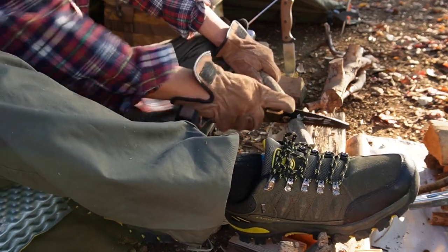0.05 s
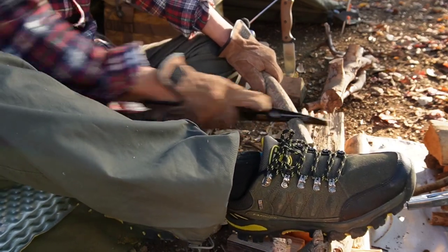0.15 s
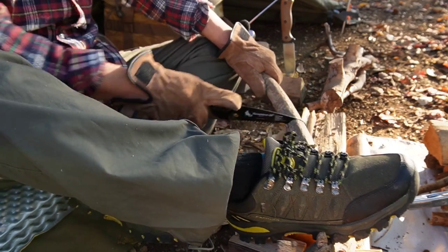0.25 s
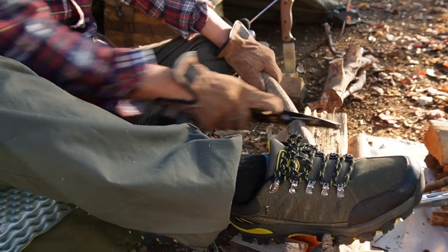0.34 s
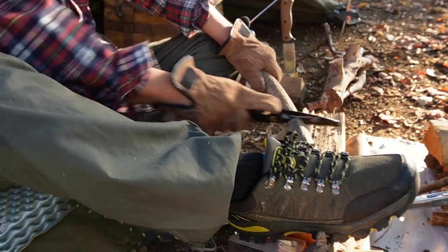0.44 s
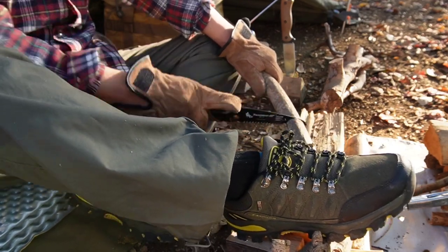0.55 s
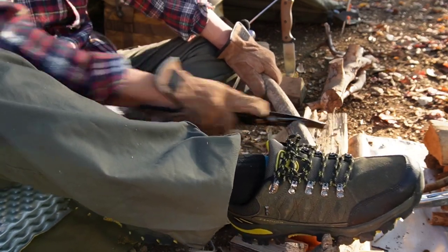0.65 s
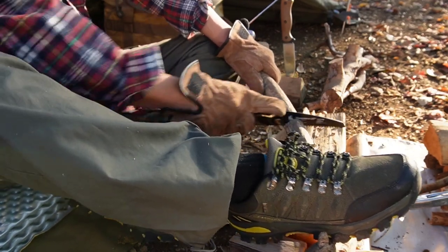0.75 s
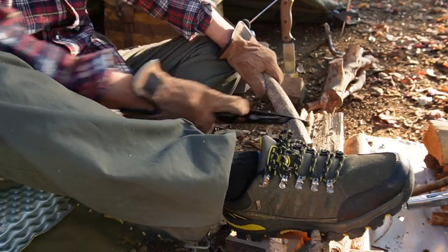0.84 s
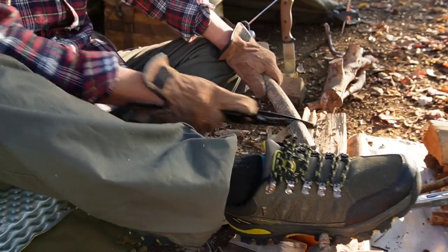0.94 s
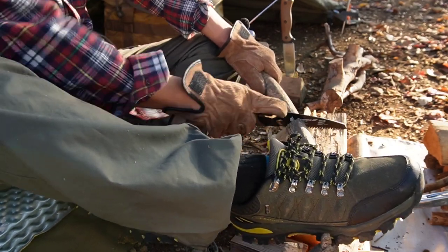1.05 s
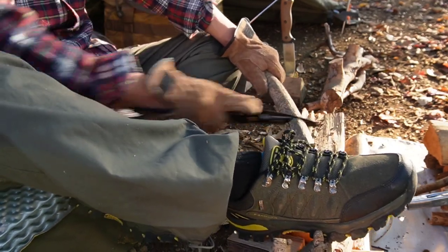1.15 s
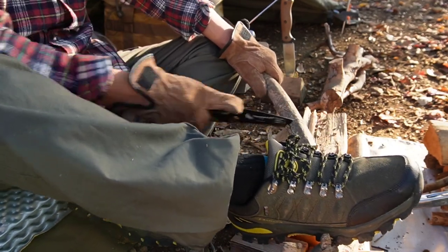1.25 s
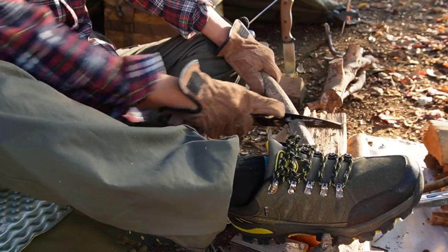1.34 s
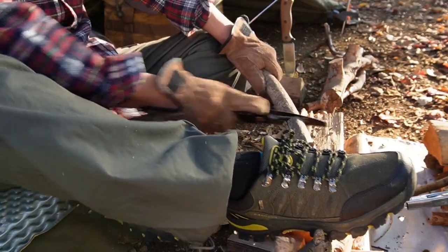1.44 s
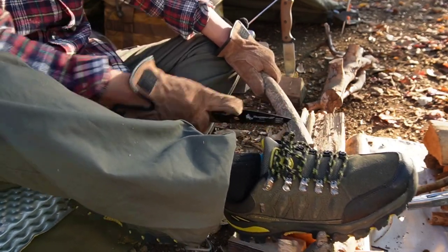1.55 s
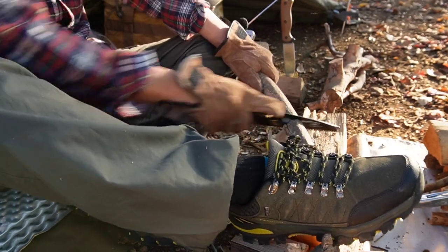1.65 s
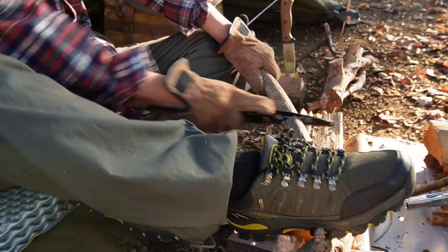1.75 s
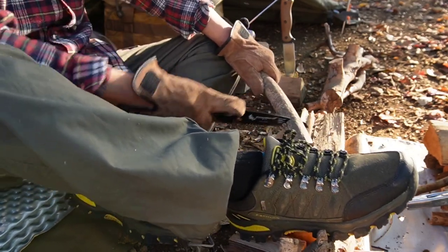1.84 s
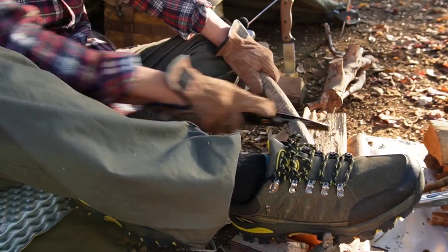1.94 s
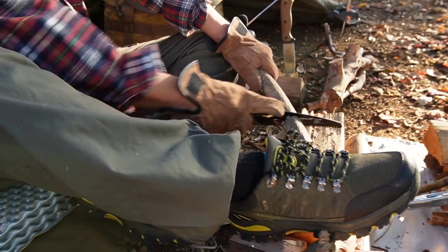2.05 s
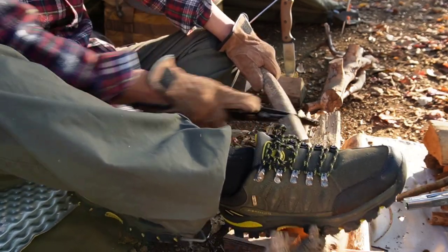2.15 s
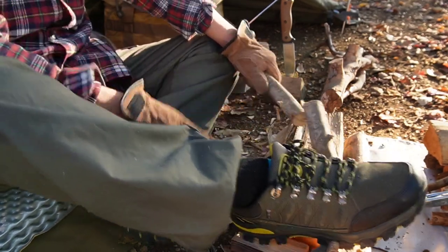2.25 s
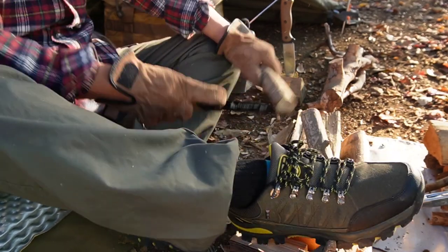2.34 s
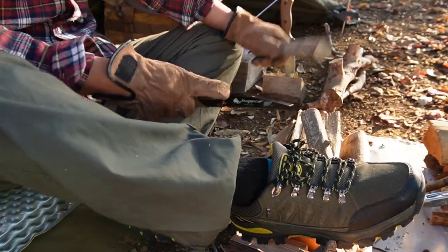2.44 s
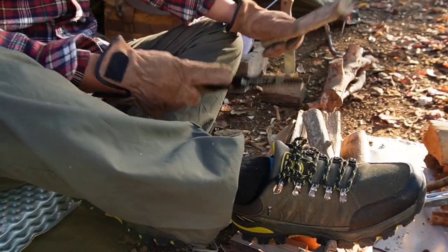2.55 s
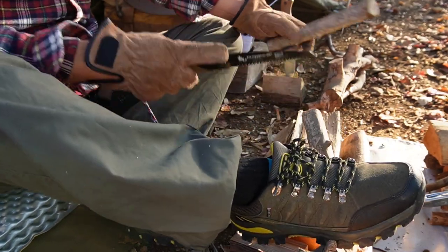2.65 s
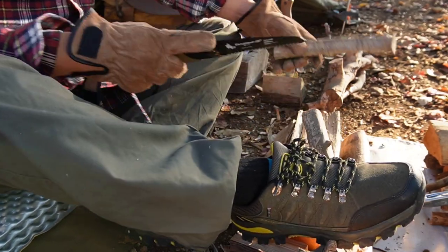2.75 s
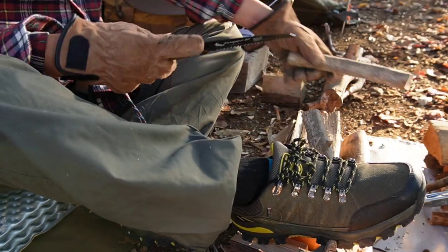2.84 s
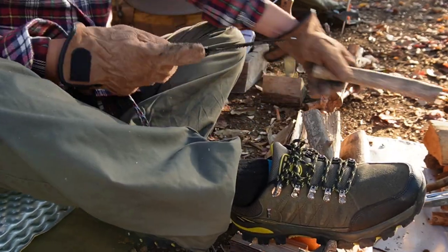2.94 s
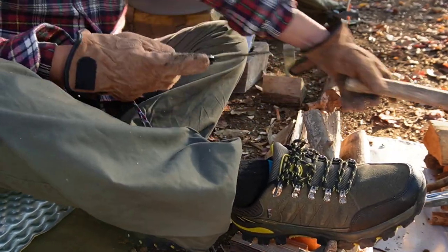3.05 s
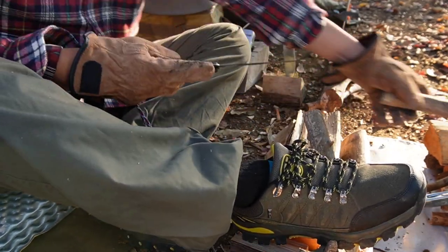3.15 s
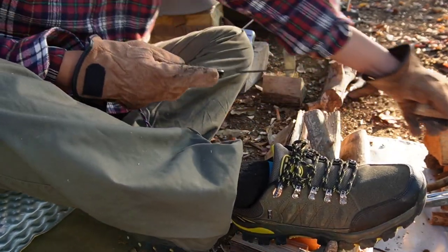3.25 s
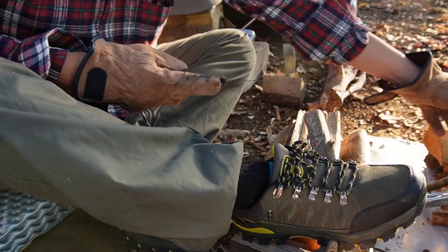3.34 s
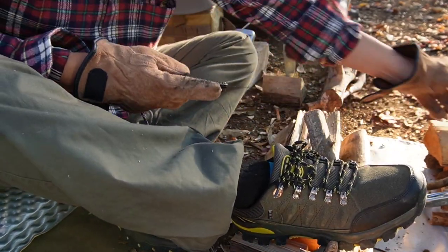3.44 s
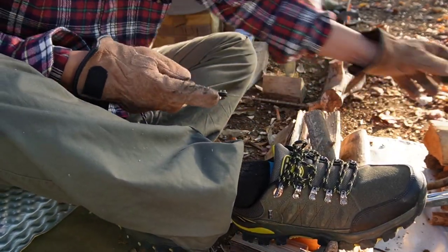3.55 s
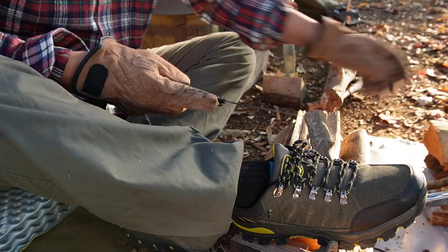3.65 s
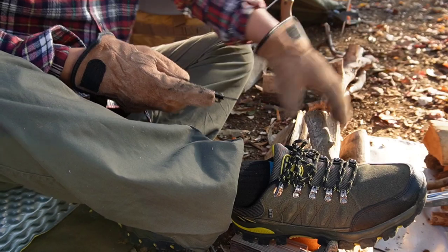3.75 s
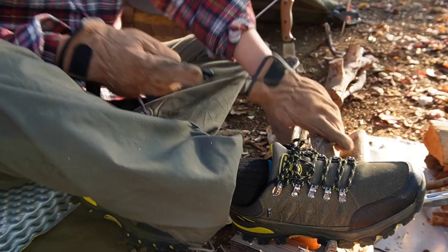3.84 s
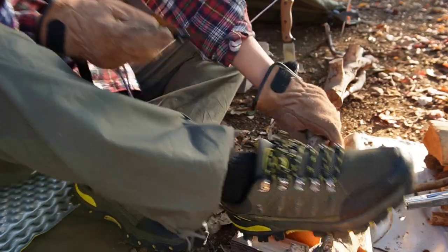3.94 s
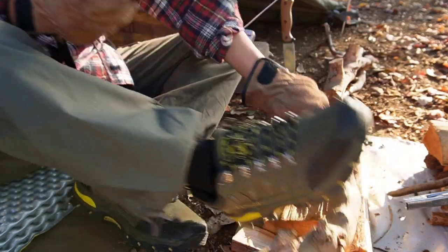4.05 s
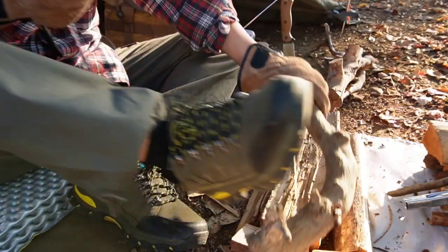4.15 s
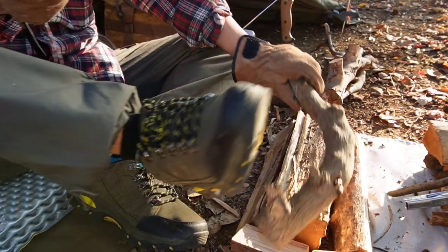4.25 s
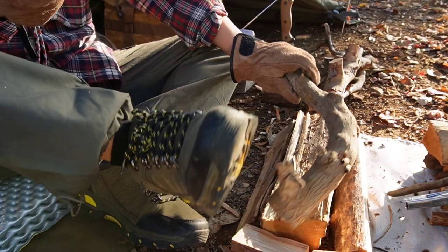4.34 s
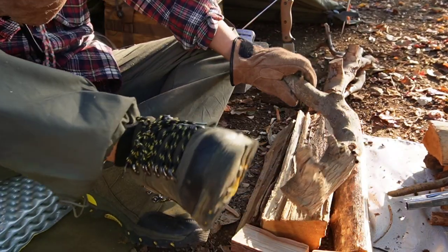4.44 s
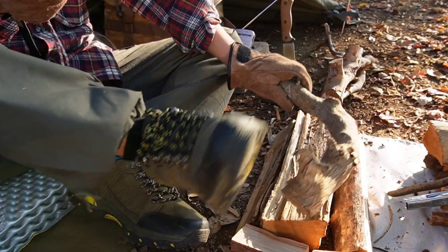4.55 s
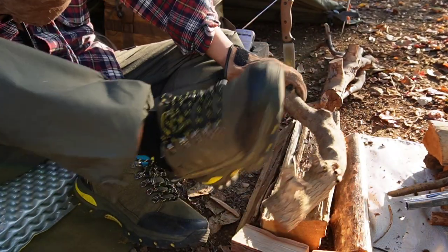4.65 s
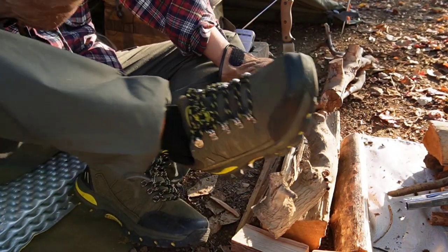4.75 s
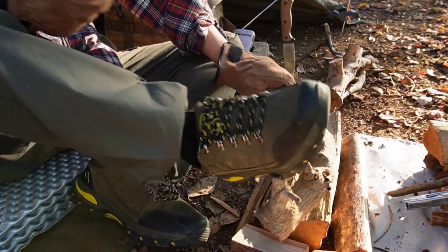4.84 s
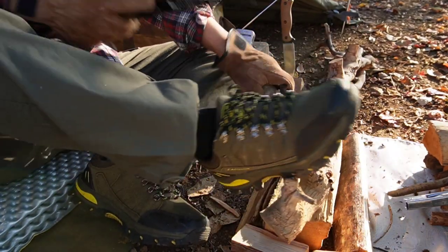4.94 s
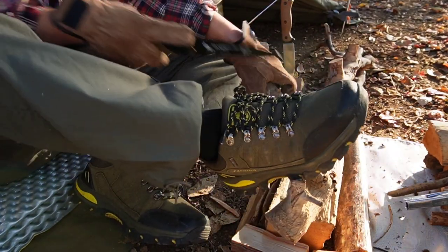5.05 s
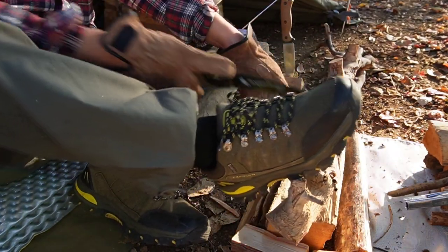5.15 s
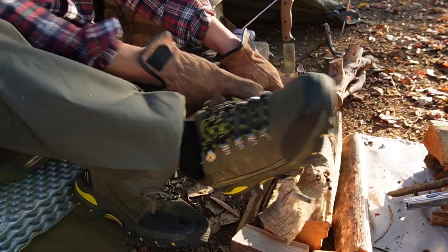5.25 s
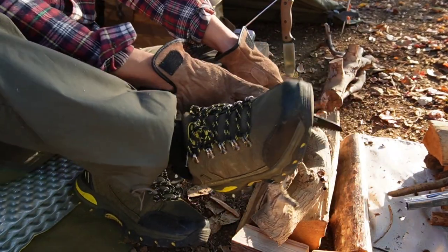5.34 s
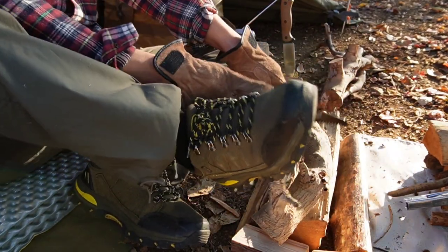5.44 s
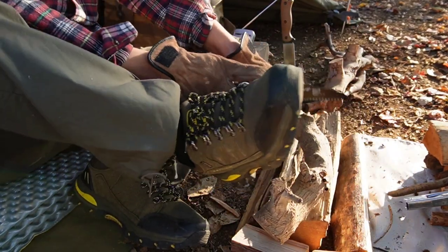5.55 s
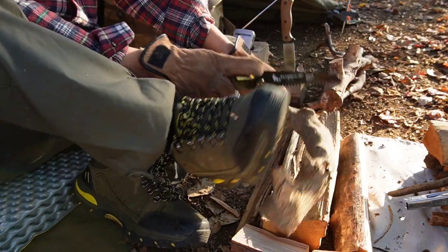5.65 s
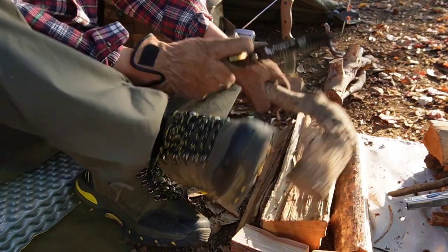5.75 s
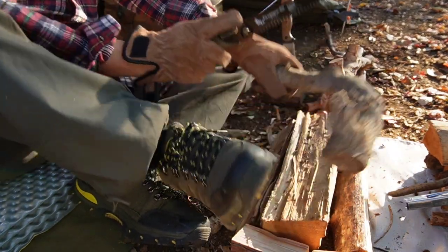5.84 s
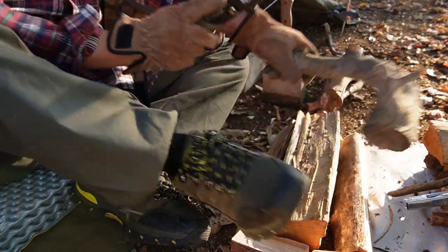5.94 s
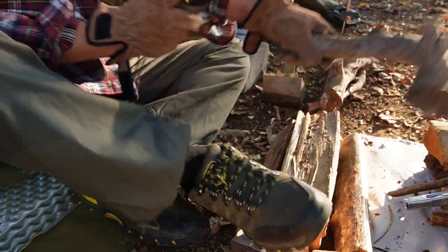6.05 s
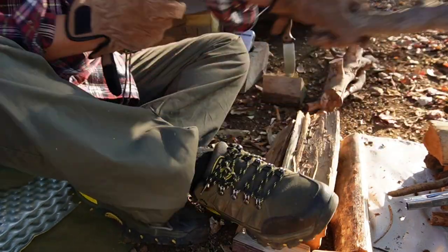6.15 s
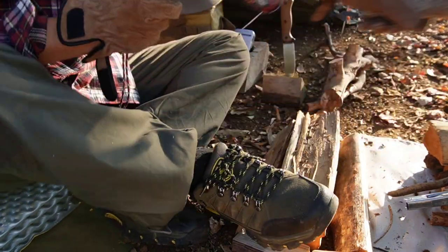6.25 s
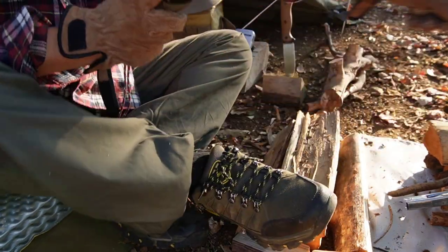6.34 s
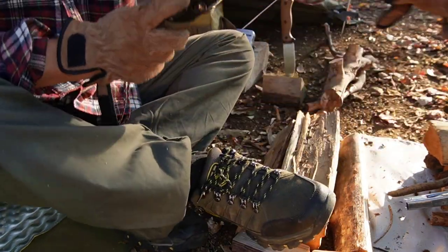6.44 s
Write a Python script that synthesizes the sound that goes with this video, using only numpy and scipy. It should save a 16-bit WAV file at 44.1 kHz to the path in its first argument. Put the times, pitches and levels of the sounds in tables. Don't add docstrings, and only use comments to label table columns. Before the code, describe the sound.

A small hand saw rasps through a dry branch in quick, even strokes, the wood splinters and drops, then gloved hands rustle and tick over wood.

```python
import sys
import numpy as np
from scipy import signal
from scipy.fft import rfft, irfft
from scipy.io import wavfile

SR = 44100
rng = np.random.default_rng(int(sys.argv[2]) if len(sys.argv) > 2 else 0)


def dump(signal):
    limited = np.clip(np.atleast_2d(signal).T, -1, 1)
    pcm = np.round(limited * 32767).astype(np.int16)
    wavfile.write(sys.argv[1], SR, pcm)


def gain_from_db(level_db):
    decades = np.asarray(level_db, float) / 20
    return 10 ** decades


N = 286197

# bite in seconds, length in seconds, cutting level in dB,
# lean towards the end in dB, blade judder in dB relative.
STROKES = [(-.025, 0.12, -19, 1, -3.5), (0.131, 0.14, -17.5, -3, -4), (0.313, 0.12, -18, -6, -6.5),
           (0.468, 0.13, -19, -2, -2), (0.628, 0.14, -21, -1, -7.5), (0.797, 0.13, -18.5, -0.5, 0),
           (0.958, .13, -18.5, 2, -11), (1.131, 0.127, -17.5, -3.5, -1.5), (1.277, 0.14, -17.5, -3, -5),
           (1.433, 0.14, -17.5, -2, -1.5), (1.603, 0.13, -18, -2, -7.5), (1.752, 0.14, -17.5, -4, -2.5),
           (1.921, .13, -19.5, 2.5, -10.5)]
REVERSALS = [round(stroke[0] * SR) for stroke in STROKES[1:]]
# frequency in Hz, likeness 0-1.
WIDE_ALIKE = [(60, 0.9), (240, 0.9), (950, 0.86), (3770, 0.71), (15000, 0.13)]
BRIGHT = signal.butter(2, [4800, 15200], "band", fs=SR, output="sos")
DULL = signal.butter(2, [410, 1250], "band", fs=SR, output="sos")


def rms_one(x):
    return x / np.sqrt(np.mean(x ** 2) + 1e-20)


def add(out, s, sound):
    i = round(s * SR)
    out[:, i:i + sound.shape[-1]] += sound[..., :N - i]


def at_hz(points, hz):
    point_hz, value = np.transpose(points)
    return np.interp(np.log(hz), np.log(point_hz), value)


def drift(rate_hz):
    r = np.exp(-80 * np.pi * rate_hz / SR)
    slow = signal.lfilter([1], [1, -2 * r, r * r], rng.standard_normal(N // 40 + 2002))[2000:]
    return np.interp(np.arange(N) / 40, np.arange(len(slow)), rms_one(slow))


def resonate(x, hz, width_hz):
    r = np.exp(-np.pi * width_hz / SR)
    zeros = np.array([1, 0, -1]) * (1 - r * r) / 2
    return signal.lfilter(zeros, [1, -2 * r * np.cos(2 * np.pi * hz / SR), r * r], x)


def band(x, low_hz, high_hz):
    edges_hz = [low_hz, min(high_hz, .36 * SR)]
    return signal.sosfilt(signal.butter(2, edges_hz, "band", fs=SR, output="sos"), x)


def grains(per_s, spread_db, size=N):
    hits = rng.random(size) < per_s / SR
    sizes = gain_from_db(spread_db * np.minimum(rng.exponential(1, size), 5)) * hits
    return rms_one(sizes * rng.standard_normal((2, size)) + 1e-18)


def coloured(source, spectrum, likeness):
    hz = np.maximum(np.fft.rfftfreq(source.shape[1], 1 / SR), 10)
    mid, side = rfft(source) * gain_from_db(at_hz(spectrum, hz))
    alike = np.clip(at_hz(likeness, hz), 0, 1)
    pair = np.sqrt(1 + alike) * mid + np.sqrt(1 - alike) * side * [[1], [-1]]
    return rms_one(irfft(pair, source.shape[1]))


def crack(ring_hz, bright_db, dull_db, t60_s, rise_s, sharp, ring_db):
    t = np.arange(round(.12 * SR)) / SR
    envelope = (1 - np.exp(-t / rise_s)) ** 2 * gain_from_db(-60 * t / t60_s)
    mid, side = rng.standard_normal((2, len(t))) * envelope
    both = mid + 0.045 * side * np.array([[1], [-1]])
    middle = band(both, ring_hz / 1.85, ring_hz * 2.34)
    middle = middle + gain_from_db(ring_db) * resonate(both, ring_hz, ring_hz / sharp)
    burst = rms_one(middle) + gain_from_db(bright_db) * rms_one(signal.sosfilt(BRIGHT, both))
    burst = burst + gain_from_db(dull_db) * rms_one(signal.sosfilt(DULL, mid))
    return burst / np.abs(burst).max()


def knocks(blows, modes, soft_s, offset_db):
    out = np.zeros((2, N))
    t = np.arange(round(.3 * SR)) / SR
    hz, level_db, t60_s = np.array(modes).T[:, :, None]
    for s, db, hardness in blows:
        strength_db = level_db + hardness * np.log2(hz / 1570) + rng.normal(0, 2.5, hz.shape)
        rings = np.sum(gain_from_db(strength_db - 60 * t / t60_s) * np.sin(2 * np.pi * hz * t), axis=0)
        add(out, s, gain_from_db(db + offset_db) * (1 - np.exp(-t / soft_s)) * rings)
    return out


def saw():
    # frequency in Hz, density in dB per Hz.
    cut_spectrum = [(240, -35), (400, -9.5), (773, -13.5), (1090, -5), (1430, -5), (1850, -1.5), (2820, -4),
                    (3410, -4), (7000, -14.5), (9100, -16), (15400, -120)]
    # frequency in Hz, density in dB per Hz.
    tear_spectrum = [(2940, -50), (5000, -4.5), (10600, -2), (11700, -4), (13000, -3.5), (15300, -3),
                     (16300, 1.5)]
    # frequency in Hz, likeness 0-1.
    near_alike = [(60, 0.9), (125, .97), (240, 1.0), (950, 1), (2000, .992), (3770, 0.96), (15000, 0.93)]
    size = round(2.1 * SR)
    load, tear_db, judder_db = strokes(size)
    teeth_hz, clear = blade_speed(size)
    turns = np.cumsum(teeth_hz * (1 + 0.016 * drift(40)[:size])) / SR
    bite = 1 + .4 * np.cos(2 * np.pi * turns)
    uneven = chatter(size) * gain_from_db(drift(60)[:size])
    cut = coloured(bite * grains(26000, .4, size=size), cut_spectrum, near_alike)
    tear = coloured(bite * grains(20000, .5, size=size), tear_spectrum, near_alike)
    wood = cut + gain_from_db(tear_db) * tear
    wood = wood + ringing(wood)
    wood = wood + patches(wood, depth_db=4.5, gain_db=-12)
    phase = 2 * np.pi * turns
    tone = np.sin(phase) + .22 * np.sin(2 * phase) + .3 * np.sin(3 * phase)
    hum = clear * gain_from_db(2.2 * drift(30)[:size]) * tone
    judder = 0.3 * rms_one(resonate(band(rng.standard_normal(size), 226, 1500), 480, 162))
    fade = np.clip((size - np.arange(size)) / (0.0308 * SR), 0, 1)
    side_gain = gain_from_db(np.array([[-3.3], [-2.7]]))
    sound = load * fade * (side_gain * uneven * wood + gain_from_db(judder_db) * (hum + judder))
    sound = sound + gain_from_db(-6.5) * resonate(sound, 1836, 23)
    return np.pad(sound, [(0, 0), (0, N - size)])


def strokes(size):
    # share of stroke 0-1, force in dB, tearing in dB relative,
    # judder in dB relative.
    shape = [(0, -12, -1, 0), (.17, -4.5, 0, 1), (.45, -0.5, 3.5, 3), (0.738, 0.5, 2.5, 3.5),
             (1, -13, -1, 6)]
    ease = [.1, 0.67, 0.43, 0.36, 0.76, .1, 0.36, .05, 0.72, 0.64, 0.73, 0.63, .2]
    rest_db, ease_share = -41.5, 0.31
    t = np.arange(size) / SR
    bite_s, length_s, db, lean_db, judder_db = np.transpose(STROKES)
    k = np.searchsorted((bite_s[1:] + (bite_s + length_s)[:-1]) / 2, t)
    done = np.clip((t - bite_s[k]) / length_s[k], 0, 1)
    share, force_db, tear_db, shake_db = np.transpose(shape)
    force = np.interp(done, share, gain_from_db(force_db) - gain_from_db(force_db[0])).clip(0)
    force = force * np.clip(done / ease_share, 0, 1) ** np.clip(ease, 0, 3)[k]
    load = gain_from_db(rest_db) + force * gain_from_db(db[k] + lean_db[k] * (2 * done - 1))
    return load, np.interp(done, share, tear_db), judder_db[k] + np.interp(done, share, shake_db)


def blade_speed(size):
    # fastest moment in seconds, tooth rate there in Hz, tooth tone in dB.
    arches = [(0.049, 461.7, 3), (0.211, 367.5, -1.5), (0.379, 400.2, -7), (.535, 324.8, -9.5),
              (0.71, 339.9, -5), (0.861, 336.9, -8.5), (1.039, 334.7, 1), (1.19, 404.6, -8.5),
              (1.359, 354.7, -5), (1.52, 444.4, -2), (1.68, 419.3, 3), (1.81, 434, -9), (1.996, 356.7, 0)]
    t = np.arange(size) / SR
    top_s, top_hz, clear_db = np.transpose(arches)
    stop_s = .54 * np.array(STROKES)[:, 1]
    k = np.searchsorted((top_s[1:] + top_s[:-1]) / 2, t)
    speed = np.cos(np.pi / 2 * np.clip((t - top_s[k]) / stop_s[k], -.9, .9))
    starting = (k % 2 == 1) & (t < top_s[k])
    slowing_sharp = np.array([4.2, 3.])[k % 2]
    return top_hz[k] * speed, gain_from_db(clear_db[k] - 2.0) * speed ** np.where(starting, 11, slowing_sharp)


def chatter(size):
    # one swell in seconds, swell rate in Hz, depth in dB.
    throbs = [
        (1.2, 92, 1.2),
        (1.5092, 100, 3),
        (1.8257, 97, 3.3),
    ]
    t = np.arange(size) / SR
    reach_s = .08
    return gain_from_db(sum(db * np.cos(2 * np.pi * hz * (t - s)) * (np.abs(t - s) < reach_s)
                   for s, hz, db in throbs))


def per_stroke(wood, hz, width_hz):
    parts = np.split(wood, REVERSALS, axis=1)
    return np.hstack([resonate(part, hz * (1 + .025 * rng.standard_normal()), width_hz)
                      for part in parts])


def ringing(wood):
    # frequency in Hz, width in Hz, level over the cut in dB.
    body = [(1070, 90, -7), (1774, 140, -2.5), (1950, 170, -3.5), (2647, 41, 0), (3370, 140, -6),
            (4320, 210, 2), (5280, 230, 0.5), (6300, 60, -5), (7050, 200, 0), (8220, 190, -4),
            (10670, 550, -2), (13000, 250, -1), (15400, 200, 2)]
    # branch ring in dB, blade ring in dB, bright patch in Hz, patch in dB.
    colours = [(4, 0.5, 3670, 1.5), (3.5, 6, 6240, 1.5), (-2.5, -9, 5600, -8), (3, 0, 4300, 3),
               (-7, -18, 3500, -9), (6.5, 3, 8800, -10), (-11, -17, 3370, -7), (5, 6, 6000, -5.5),
               (-3.5, -18, 2577, -5.5), (2.5, 0.5, 4240, -7.5), (-5, -9, 7200, -10.5), (3, 1.5, 4330, -10),
               (-3.5, -1, 8600, -3)]
    blade_above_hz, wander_db = 5000, 3.0
    size = wood.shape[1]
    branch_db, blade_db, patch_hz, patch_db = np.transpose(colours)
    k = np.searchsorted(REVERSALS, np.arange(size))
    rings = 0
    for hz, width_hz, db in body:
        stroke_db = (blade_db if hz > blade_above_hz else branch_db)[k]
        gain = gain_from_db(db + stroke_db + wander_db * drift(24)[:size])
        rings = rings + gain * per_stroke(wood, hz, width_hz)
    parts = np.split(wood, REVERSALS, axis=1)
    patch = np.hstack([resonate(part, hz, hz / 9.7) for part, hz in zip(parts, patch_hz)])
    return rings + gain_from_db(patch_db[k] + wander_db * drift(24)[:size]) * patch


def patches(wood, depth_db, gain_db):
    size = wood.shape[1]
    pitches_hz = np.geomspace(900, 14000, 14) * gain_from_db(rng.normal(0, 1.0, 14))
    return sum(gain_from_db(gain_db + depth_db * drift(22)[:size]) * per_stroke(wood, hz, hz / 9)
               for hz in pitches_hz)


def snapping_teeth():
    # time in seconds, peak in dB.
    snaps = [(0.0139, -2), (0.129, -25), (.159, -24), (0.184, 0), (.281, -28), (0.345, -9), (0.374, -10),
             (.468, -37), (0.488, -13), (0.563, -21), (0.6562, -15), (.7183, -16), (0.815, -10.5),
             (0.817, -2.5), (0.8903, -3), (.907, -15), (.913, -11), (1.014, -17), (1.061, -17),
             (1.069, -16), (1.0755, -14), (1.1275, -36), (1.1462, 0), (1.179, -16), (1.3067, -16),
             (1.446, -15), (1.4630, -0.5), (1.605, -30), (1.612, -19), (1.6424, -3), (1.772, -9),
             (1.8042, -7), (1.912, -17), (2.025, -7), (2.034, -10)]
    # time in seconds, peak in dB, ring in Hz.
    catches = [(0.3034, -16.5, 1600), (1.0817, -12.5, 2500), (1.1226, -37, 3497), (1.139, -12, 2200),
               (1.4653, -16, 1900), (1.8038, -2.5, 3500), (1.874, -16, 3032), (1.935, -9, 2650)]
    # time in seconds, peak in dB, ring in Hz.
    snags = [(2.1401, -3.5, 1890), (2.1515, -3, 1870), (2.164, 0, 3270), (2.178, -6, 2620), (2.19, 2, 3300),
             (2.22, -6, 1480), (2.224, -8, 4550), (2.228, -9, 3000), (2.233, -2, 4260), (2.236, -11, 3300)]
    out = np.zeros((2, N))
    for s, db in snaps:
        add(out, s, gain_from_db(db) * crack(6800, 2.2, -18, 0.0045, .00006, 3.3, 0))
        add(out, s, gain_from_db(2 * db - 30) * np.hanning(40) * rng.uniform(.75, 1.25, (2, 1)))
    for s, db, hz in catches:
        add(out, s, gain_from_db(db) * crack(hz, -3.0, -22.0, 0.018, 0.00093, 5.0, 0))
    for s, db, hz in snags:
        add(out, s - .0015, gain_from_db(db) * crack(hz, -6, -12, .0125, .006, 10.0, 3))
    return out


def breaking_branch():
    # time in seconds, peak in dB, ring in Hz, t60 in seconds.
    splinters = [(2.088, -21, 3750, .015), (2.0935, -5, 2200, .018), (2.0937, -5, 6000, .016),
                 (2.103, -15, 4350, .02), (2.116, -21, 1900, .03), (2.1977, 5, 4300, .011),
                 (2.1985, -2, 2000, .012), (2.2011, 1, 3400, .013), (2.2038, 1, 3300, .016),
                 (2.2062, -5, 4300, .016), (2.2411, 0, 3500, .014), (2.259, -17, 4000, .008)]
    # time in seconds, peak in dB, ring in Hz, bright part in dB, t60 in seconds.
    bounces = [(2.266, -5.5, 4000, -20, 0.025), (2.27, -6, 3120, -10, 0.033), (2.278, -12, 905, -15, 0.025),
               (2.282, -15, 3400, -17, 0.09), (2.2968, -11.5, 1880, -17, 0.008),
               (2.299, -22, 1900, -20, 0.03), (2.314, -27, 1560, -3, .02), (2.336, -18, 1050, -20, 0.0054),
               (2.357, -12, 880, -24, 0.02), (2.3655, -16, 1300, -30, 0.014), (2.367, -8, 2280, -28, 0.02),
               (2.367, -20, 5170, -32, 0.075), (2.408, -31, 3850, -20, 0.021)]
    out = np.zeros((2, N))
    for s, db, hz, t60_s in splinters:
        add(out, s, gain_from_db(db) * crack(hz, -10, -20, t60_s, 0.00028, 12.0, 3.0))
    for s, db, hz, bright_db, t60_s in bounces:
        add(out, s, gain_from_db(db) * crack(hz, bright_db, -14, t60_s, 0.0003, 10.0, 3.0))
    return out


def saw_lock():
    # time in seconds, peak in dB, hardness in dB per octave.
    latch = [
        (2.7103, 0, -4),
    ]
    # frequency in Hz, level in dB, t60 in seconds.
    handle = [(1600, -28, 0.067), (2740, -10, 0.019), (4030, 2, 0.021), (6220, -2, 0.021),
              (7130, 11, 0.0068), (13700, -9, 0.015), (15300, -6, 0.0052)]
    out = knocks(latch, handle, .0001, -8.0)
    for s, db, hardness in latch:
        add(out, s, gain_from_db(db - 4) * crack(7000, -6, -30, 0.005, .00008, 2.5, 0))
        add(out, s, gain_from_db(db - 36) * np.hanning(40)[None])
    return out


def tossed_stick():
    # time in seconds, peak in dB, hardness in dB per octave.
    toss = [(3.406, -25, 10), (3.42, -25, 4), (3.4342, -25.5, -13.5), (3.438, -16.5, 0.5), (3.465, -28, 2),
            (3.493, -33.5, 2), (3.509, -28.5, -0.5)]
    # frequency in Hz, level in dB, t60 in seconds.
    stick = [(652, -5.5, 0.047), (856, -1, 0.031), (1290, 15.5, 0.012), (1570, 2, 0.11),
             (1950, -4.5, 0.095), (2260, -0.5, 0.028), (3850, 9, 0.011), (4000, 0, 0.022), (4500, -15, .04),
             (5400, -14, 0.046)]
    out = knocks(toss, stick, 0.002, -10.0)
    for s, db, hardness in toss:
        crunch = crack(3230, -14, -4 - hardness, 0.16, 0.00021, 3.2, 0)
        add(out, s, gain_from_db(db - 10.0 + hardness) * crunch)
    return out * gain_from_db(np.array([[-2.5], [2.5]]))


def log_thud():
    # time in seconds, peak in dB, hardness in dB per octave.
    thud = [
        (6.068, -28.5, -1.5),
    ]
    # frequency in Hz, level in dB, t60 in seconds.
    log = [(296, -2, 0.047), (490, 2, 0.036)]
    return knocks(thud, log, 0.0038, -4.5)


def blade_ping():
    # time in seconds, peak in dB, hardness in dB per octave.
    ping = [
        (5.392, -34, 0),
    ]
    # frequency in Hz, level in dB, t60 in seconds.
    blade = [(8100, -12, 0.033), (9000, -12, .03), (10500, -9, .03), (13000, -6, .08), (14700, -14, .02)]
    return knocks(ping, blade, .0002, -3.0)


def squeaks():
    # start in seconds, end in seconds, frequency in Hz, width in Hz, level in dB.
    rubs = [(3.061, 3.135, 4520, 40.3, -58), (3.085, 3.113, 3370, 60, -49),
            (3.627, 4.142, 11600, 910, -59.5), (3.873, 3.917, 1523, 50, -41.5),
            (3.925, 3.965, 1990, 60, -44), (4.038, 4.105, 4430, 30, -54), (4.593, 4.9, 1950, 130, -56.5),
            (4.76, 5.233, 1980, 130, -53.5), (4.96, 5.05, 5100, 450, -56), (5.02, 5.1, 4820, 400, -56),
            (5.077, 5.18, 4500, 300, -55), (4.953, 5.2, 3070, 500, -53), (5.294, 5.327, 3620, 1200, -41),
            (5.044, 5.447, 1120, 200, -59), (5.595, 5.712, 1454, 80, -55), (5.63, 5.8, 1970, 200, -61),
            (5.623, 5.717, 4800, 400, -62), (5.739, 5.85, 950, 40, -60), (5.95, 6.01, 950, 40, -63),
            (6.145, 6.23, 870, 40, -60), (6.38, 6.49, 870, 30, -59), (6.38, 6.49, 1950, 60, -61),
            (5.76, 5.86, 690, 40, -64), (.425, .475, 490, 40, -44), (1.262, 1.31, 1050, 60, -42),
            (.095, .15, 1750, 250, -36), (6.2, 6.462, 11700, 800, -60), (6.3, 6.423, 3800, 1200, -50.5)]
    out = np.zeros((2, N))
    for start_s, end_s, hz, width_hz, db in rubs:
        mid, side = rng.standard_normal((2, SR))[:, :round((end_s - start_s) * SR)]
        noise = mid + 0.14 * side * np.array([[1], [-1]])
        tone = resonate(resonate(noise, hz, width_hz), hz, width_hz)
        add(out, start_s, gain_from_db(db) * rms_one(tone) * signal.windows.tukey(tone.shape[1], .6))
    return out


def handling_clicks():
    # time in seconds, peak in dB, ring in Hz, bright part in dB.
    ticks = [(2.462, -34, 1540, -12), (2.521, -25.5, 3280, -4), (2.623, -35, 3780, 6),
             (2.7566, -27, 1960, -7), (3.086, -34, 3480, -20), (3.8122, -32, 3230, -9),
             (3.832, -27.5, 1290, 0), (3.875, -35, 1570, 3), (3.9, -39, 1570, -6), (4.085, -34.5, 4450, 8),
             (4.6726, -33, 1960, -4), (4.7593, -25, 3300, 4), (4.8552, -29, 1970, 20),
             (4.865, -26, 3360, 2), (4.8949, -17, 4440, -12), (4.939, -31, 3200, -9),
             (5.0888, -36, 2970, -14), (5.286, -32.5, 2500, -14), (5.296, -30, 2500, -16),
             (5.307, -40, 2600, -17), (5.312, -35, 3000, -18), (5.321, -35, 2000, -14),
             (5.3426, -25, 4770, -11), (5.392, -37, 1140, 4), (5.617, -29, 4860, -25),
             (6.1723, -32, 2500, 0), (6.381, -39, 3570, -8)]
    # time in seconds, peak in dB, ring in Hz.
    specks = [(2.333, -33, 9000), (2.35, -37, 9000), (2.7, -33, 6500), (2.6, -34, 10400),
              (2.677, -40, 12000), (2.77, -31, 10000), (2.778, -35, 12000), (2.801, -37, 13000),
              (2.838, -35, 11000), (3.149, -37, 9600), (3.244, -41, 9000), (3.257, -46, 13000),
              (3.296, -41, 13000), (3.315, -40, 13500), (3.344, -41, 12000), (3.3643, -31, 10000),
              (3.729, -43, 11600), (4.768, -28, 8000), (4.775, -37, 11000), (4.786, -43, 11000),
              (4.872, -35, 11000), (4.88, -44, 12000), (5.121, -43, 13500), (5.334, -43, 11000),
              (5.362, -39, 13000), (5.373, -37, 13500), (5.385, -40, 13500), (5.417, -38, 12000),
              (5.599, -41, 8000), (5.6204, -22, 6140), (6.008, -38, 11000), (6.072, -38, 5000),
              (6.123, -39, 7000), (6.161, -29, 3000)]
    # time in seconds, peak in dB, ring in Hz.
    taps = [(2.368, -22, 5300), (2.369, -25, 6650), (2.37, -28, 7450), (2.408, -21, 4000),
            (2.516, -24, 4470), (2.682, -23.5, 4090), (3.0852, -27, 4410), (3.256, -35, 3370),
            (3.299, -35, 3700), (3.361, -26, 3610), (3.9403, -27, 1960), (4.202, -31.5, 4100),
            (4.5, -40, 4130), (4.771, -31, 4330), (4.94, -32, 3740), (3.499, -39, 3950), (5.305, -25, 3850),
            (5.308, -26, 2860), (5.3148, -29, 3920)]
    # time in seconds, left over right in dB.
    hands = [(2.6, 1.5), (3.3, -7), (3.8, -1.5), (4.7, 2.5), (5.6, -5), (6.1, 1), (6.4, -14)]
    out = np.zeros((2, N))
    t = np.arange(round(.05 * SR)) / SR
    for s, db, hz, bright_db in ticks:
        add(out, s, gain_from_db(db + 2) * crack(hz, bright_db, -34, .007, .0002, 5.0, 5))
    for s, db, hz in specks:
        add(out, s, gain_from_db(db) * crack(hz, -12, -40, .006, .0002, 4.0, 10))
    for s, db, hz in taps:
        add(out, s, gain_from_db(db - 4) * crack(hz, -22, -30, .015, .0004, 14.0, 16))
        envelope = gain_from_db(db - 5 - 60 * t / .028) * (1 - np.exp(-t / .0006))
        add(out, s, envelope * np.sin(2 * np.pi * hz * t))
    pan_db = np.interp(np.arange(N) / SR, *np.transpose(hands))
    return out * gain_from_db(pan_db * [[.5], [-.5]])


def swell(start_s, swell_s, db, fade_db_per_s):
    t = np.arange(0, N, 40) / SR - start_s
    fade = gain_from_db(db - fade_db_per_s * np.maximum(t - swell_s, 0))
    return np.repeat((np.clip(t / swell_s, 0, 1) * fade) ** 2, 40)[:N]


def rustle():
    # start in seconds, swell in seconds, leaf level in dB,
    # fade in dB per second, cloth in dB relative.
    moves = [(2.06, 0.14, -21, 130, 0.5), (2.38, 0.02, -41, 93, -26), (2.429, 0.051, -48.5, 14, -1),
             (3.2, 0.18, -56.5, 51, 1), (3.39, 0.041, -57, 46, -17), (3.8, 0.022, -46.5, 27.5, -3),
             (3.93, 0.067, -54.5, 45, 5.5), (4.55, 0.16, -51.5, 18, -0.5), (4.84, 0.018, -50.5, 10.5, -1.5),
             (4.979, 0.085, -53, 25, -20), (5.58, 0.019, -51, 27, 2), (5.95, 0.14, -48.5, 49, 2),
             (6.36, 0.34, -42.5, 48, -2)]
    # start in seconds, rumble in dB.
    drags = [(2.08, -38), (2.35, -62), (3.42, -58), (3.9, -57), (4.55, -58), (4.76, -59), (5.0, -72),
             (5.67, -54), (6.02, -51)]
    # frequency in Hz, density in dB per Hz.
    leaf_spectrum = [(410, -23), (700, -9), (775, -6), (1500, -0.5), (1790, 1.5), (1960, 0.5), (2190, -1),
                     (3920, 0.5), (8000, -13.5), (10400, -70), (17600, -120)]
    cloth_spectrum = [(2940, -23.5), (5000, -2), (6890, -8.5), (7570, -9), (8780, -8.5), (12800, -11.5),
                      (15200, -15.5), (16300, -59)]
    rumble_spectrum = [(150, -26), (300, -23.5), (500, -13), (900, -10.5), (1300, -22.5)]
    still_leaf_db, still_cloth_db, still_rumble_db = -59, -79, -63.5
    leaf_power, cloth_power = gain_from_db(2 * still_leaf_db), gain_from_db(2 * still_cloth_db)
    for s, swell_s, db, fade_db, cloth_db in moves:
        leaf_power = leaf_power + swell(s, swell_s, db, fade_db)
        cloth_power = cloth_power + swell(s, swell_s, db + cloth_db, fade_db)
    drag_power = gain_from_db(2 * still_rumble_db) + sum(swell(s, 0.098, db, 44.5) for s, db in drags)
    leaves = coloured(grains(12000, 0.62) * gain_from_db(0.52 * drift(5.0)), leaf_spectrum, WIDE_ALIKE)
    cloth = coloured(grains(5100, 0.33) * gain_from_db(0.5 * drift(13)), cloth_spectrum, WIDE_ALIKE)
    rumble_noise = rng.standard_normal((2, N)) * gain_from_db(0.82 * drift(3.4))
    rumble = coloured(rumble_noise, rumble_spectrum, WIDE_ALIKE)
    leaves = leaves + patches(leaves, depth_db=5.0, gain_db=-8)
    moving = np.clip((np.arange(N) / SR - 2.04) / 0.22, 0, 1)
    return moving * (np.sqrt(leaf_power) * leaves + np.sqrt(cloth_power) * cloth
                     + np.sqrt(drag_power) * rumble)


def still_air():
    # frequency in Hz, density in dB per Hz.
    air_spectrum = [(18, -69), (30, -44), (124, -4), (245, -9.5), (449, -0.5), (666, -12), (1430, -2.5),
                    (4910, -28), (6550, -6), (12600, -11), (16000, -17.5)]
    return gain_from_db(-61.5) * coloured(rng.standard_normal((2, N)), air_spectrum, WIDE_ALIKE)


def scene():
    cutting = saw() + snapping_teeth() + breaking_branch()
    objects = saw_lock() + tossed_stick() + log_thud() + blade_ping()
    handling = squeaks() + handling_clicks() + rustle()
    return cutting + objects + handling + still_air()


def band_limit(x):
    return signal.sosfilt(signal.butter(12, 16250, fs=SR, output="sos"), x)


def record(dry):
    thin = signal.sosfilt(signal.butter(1, 100, "high", fs=SR, output="sos"), dry)
    overloaded = np.clip(thin, -1.05, 1.05)
    cut = signal.sosfilt(signal.cheby2(12, 40, 16000, fs=SR, output="sos"), overloaded)
    return band_limit(np.clip(cut, -1, 1))


dry = scene()
out = record(dry)
dump(out)
```